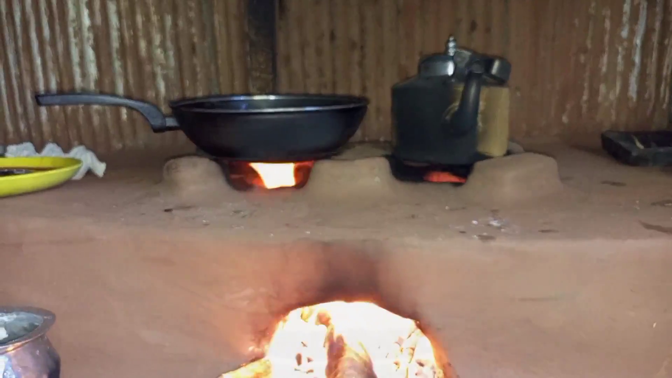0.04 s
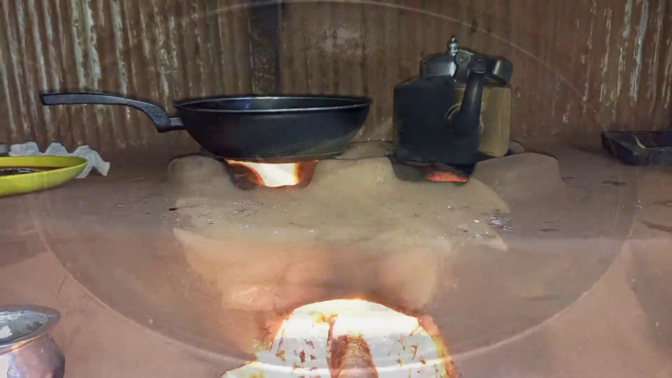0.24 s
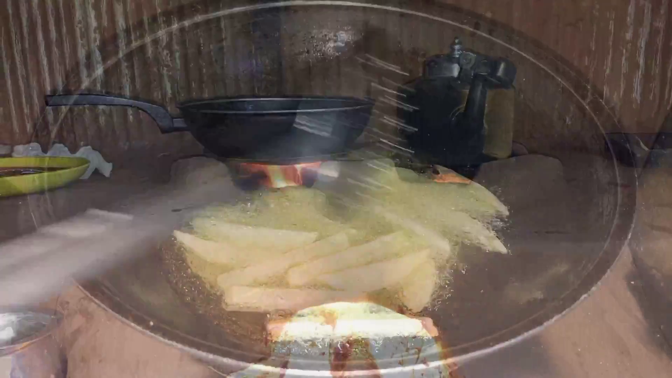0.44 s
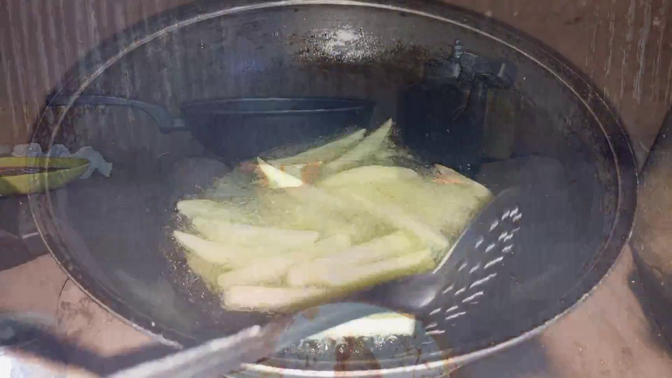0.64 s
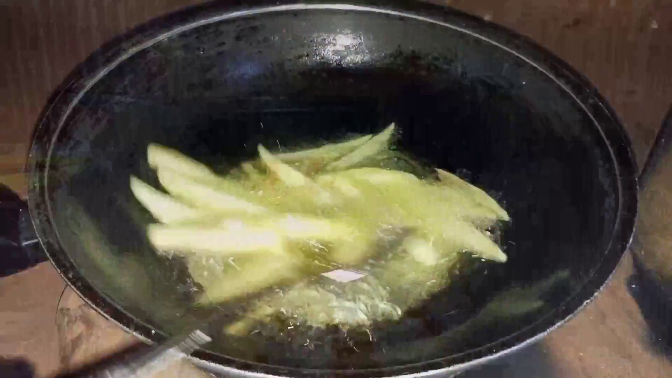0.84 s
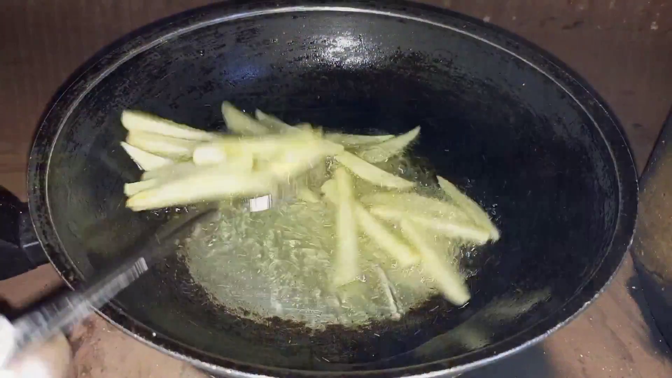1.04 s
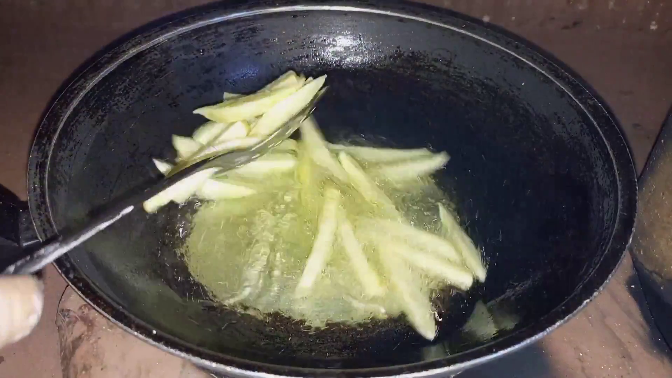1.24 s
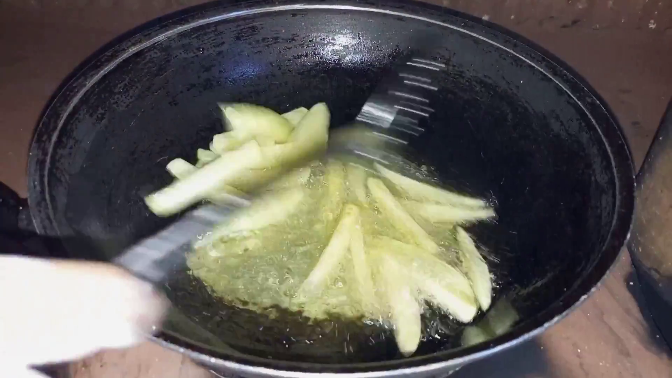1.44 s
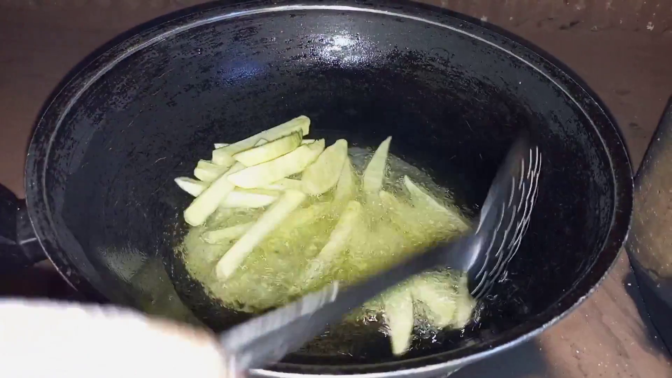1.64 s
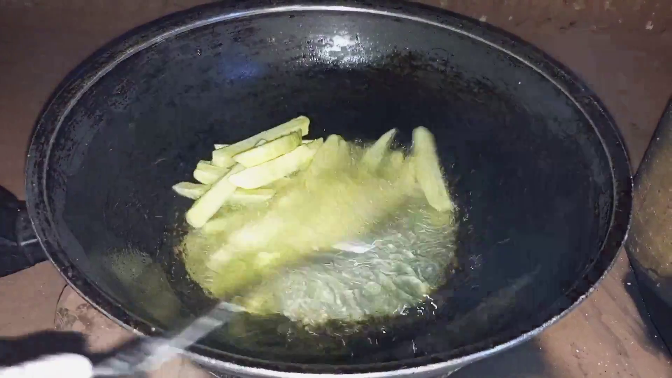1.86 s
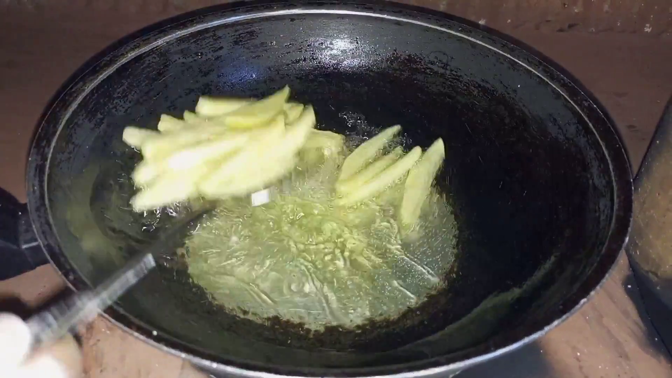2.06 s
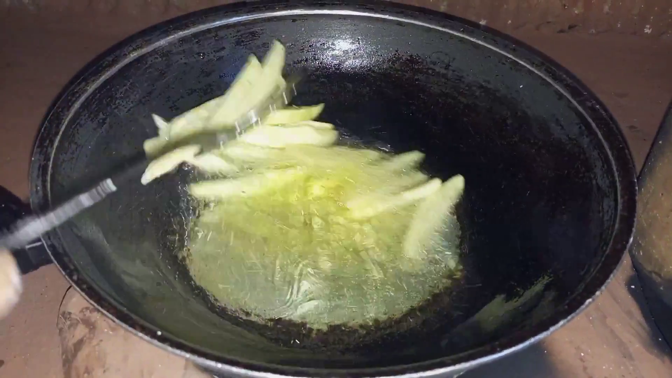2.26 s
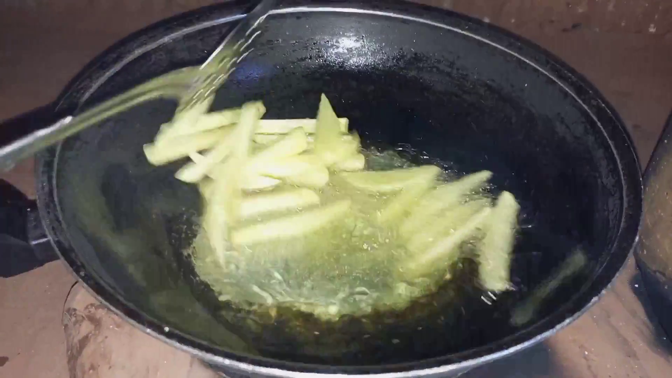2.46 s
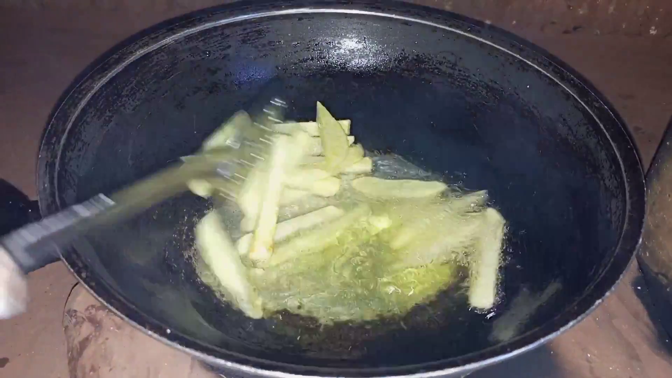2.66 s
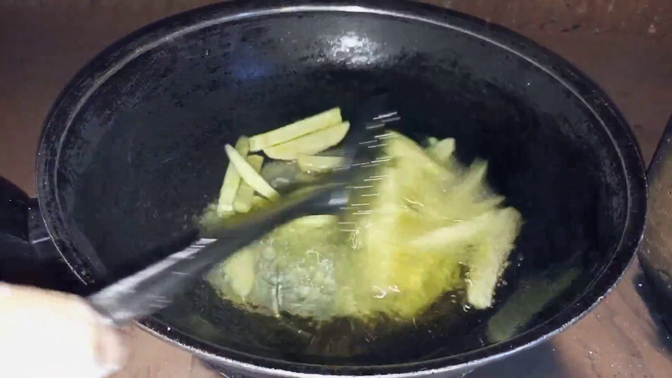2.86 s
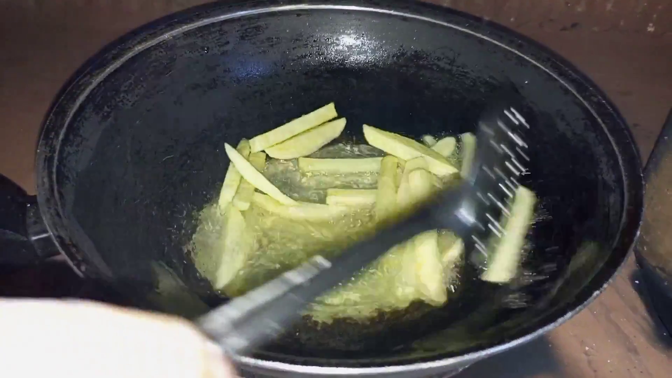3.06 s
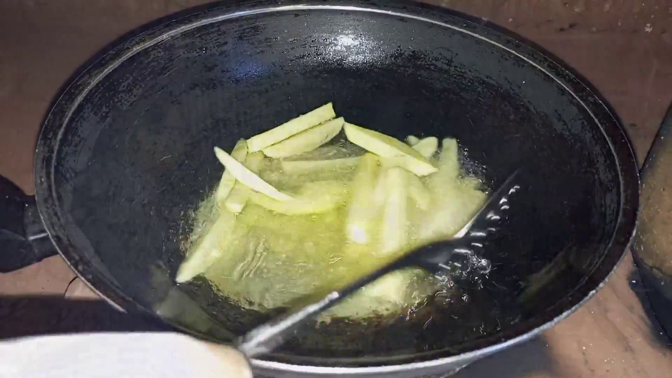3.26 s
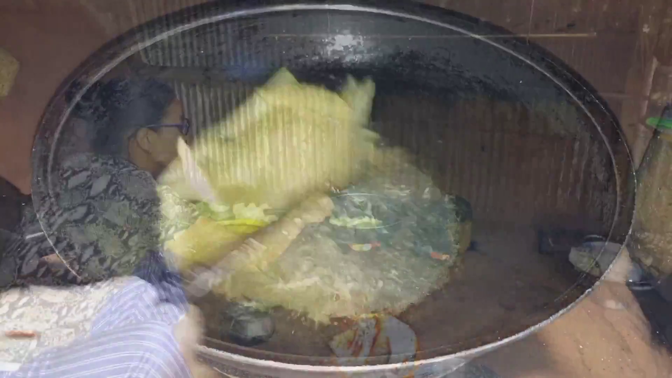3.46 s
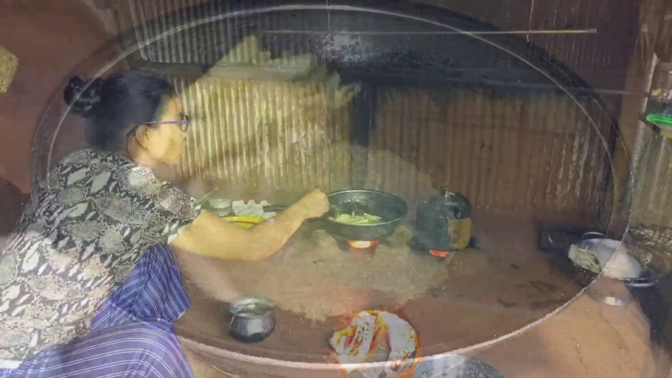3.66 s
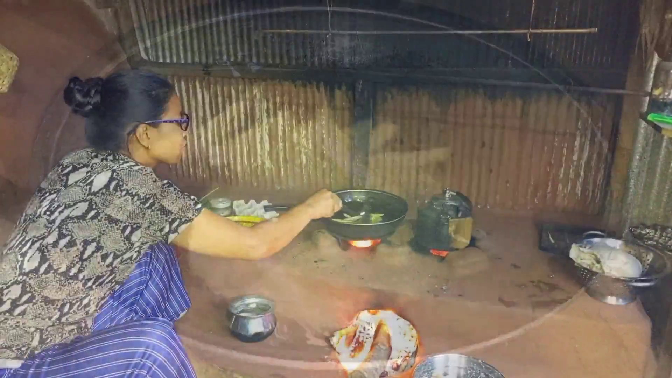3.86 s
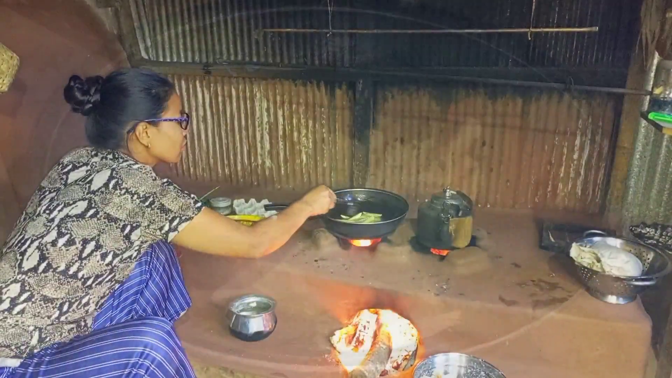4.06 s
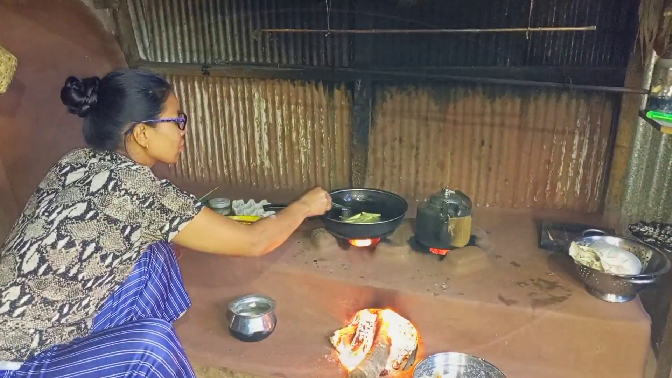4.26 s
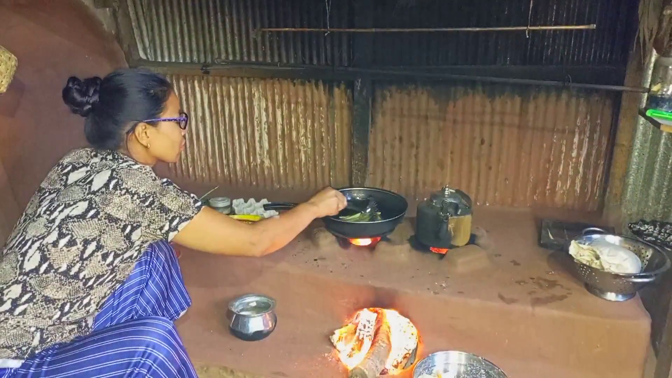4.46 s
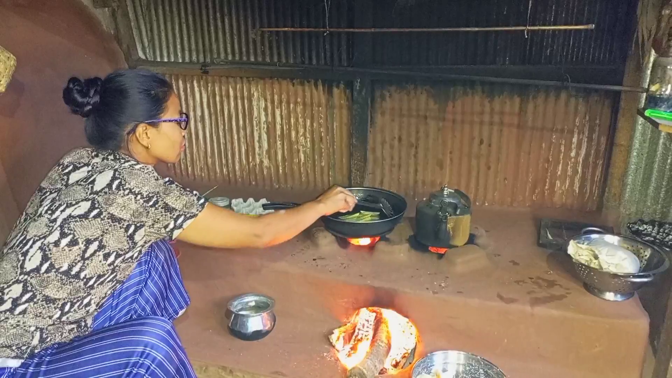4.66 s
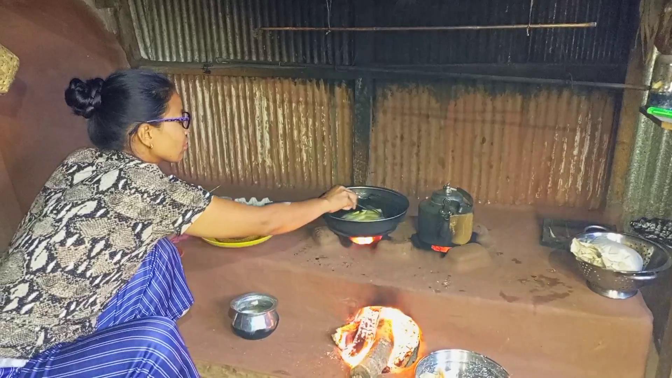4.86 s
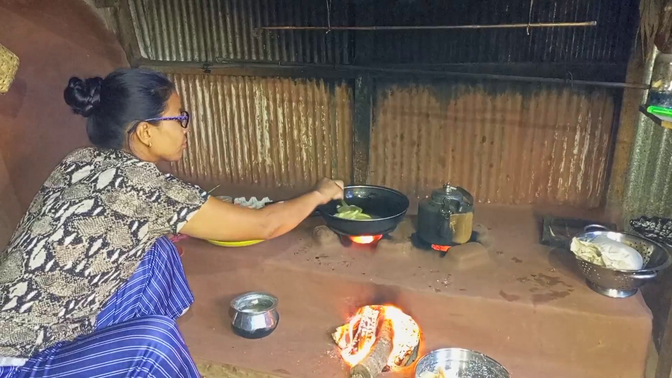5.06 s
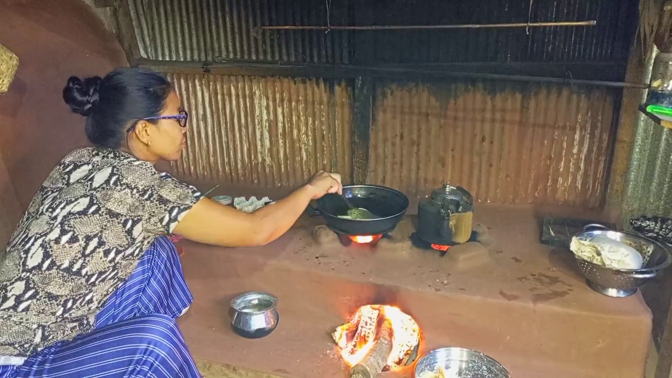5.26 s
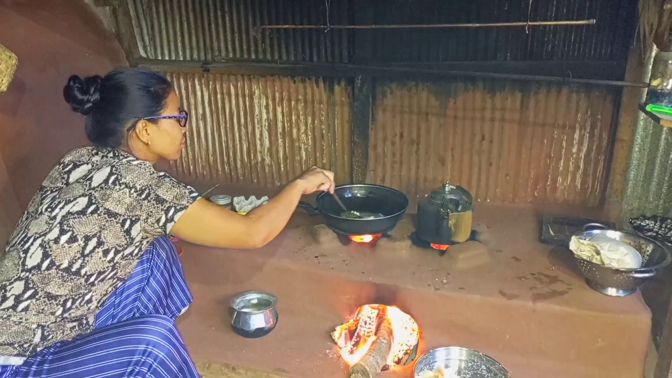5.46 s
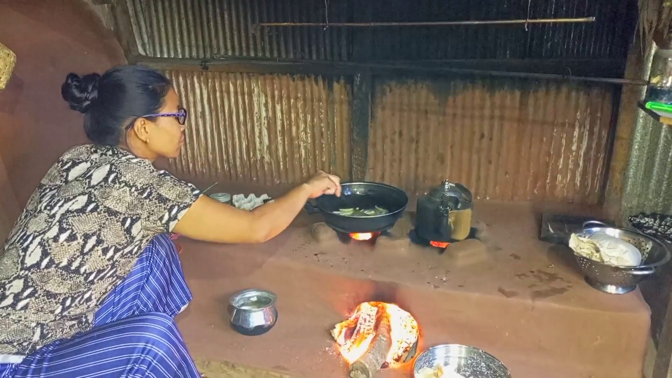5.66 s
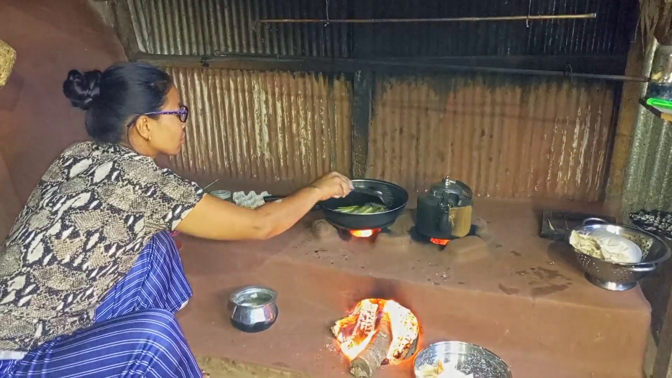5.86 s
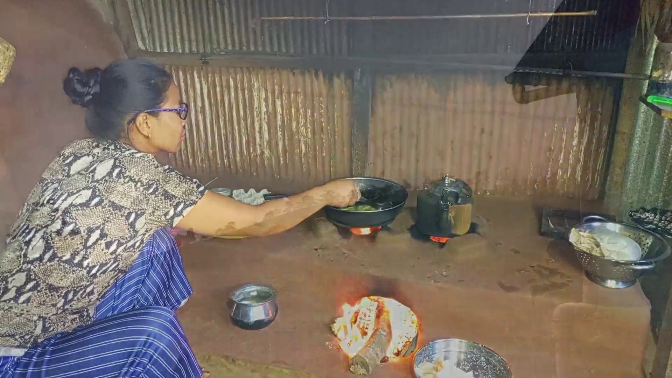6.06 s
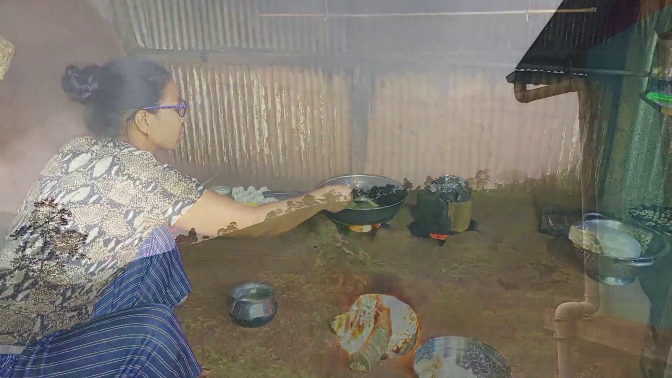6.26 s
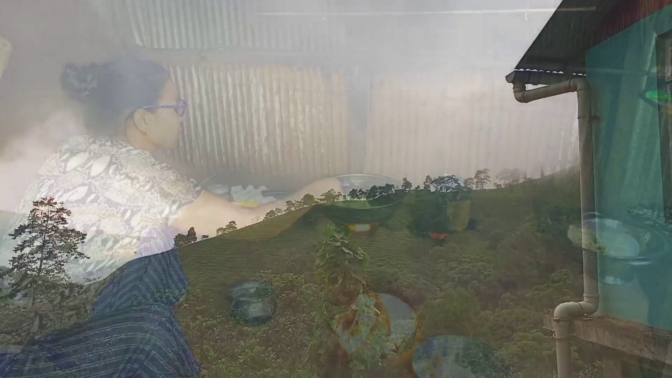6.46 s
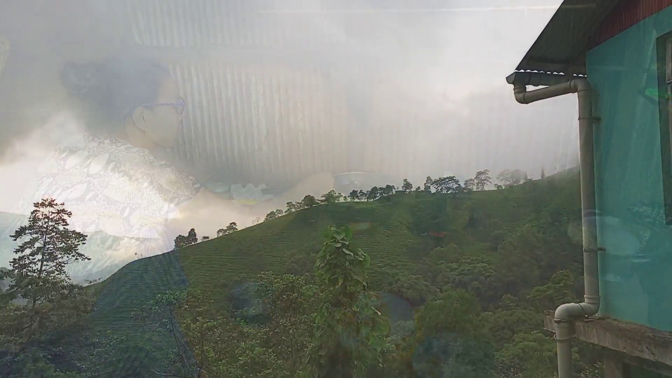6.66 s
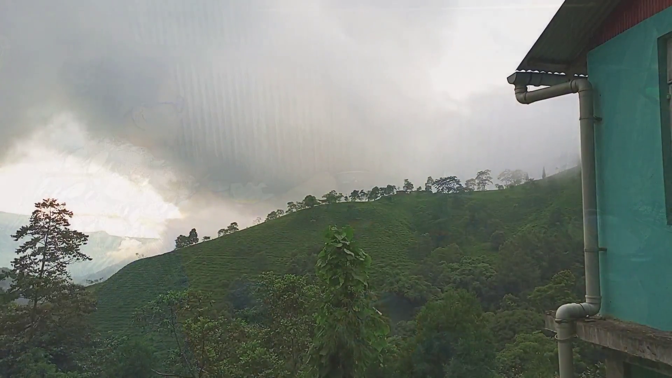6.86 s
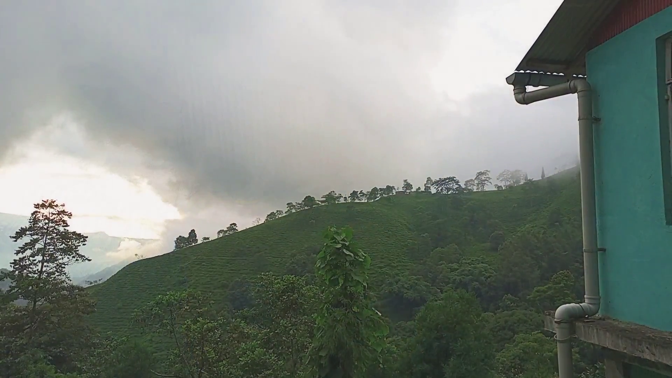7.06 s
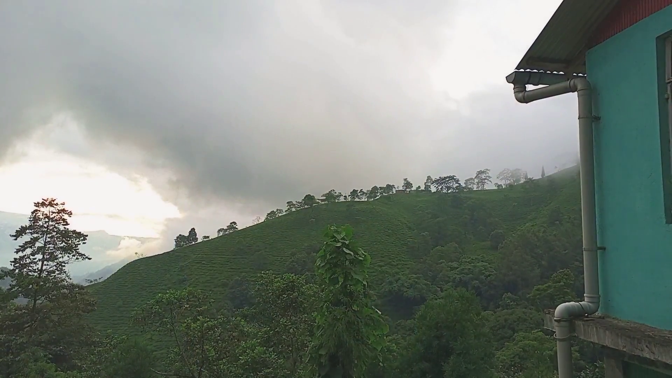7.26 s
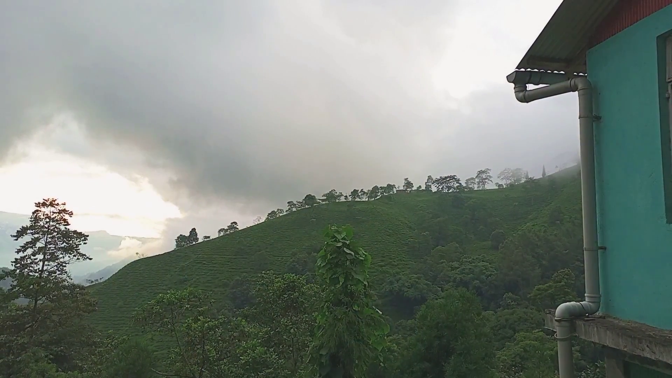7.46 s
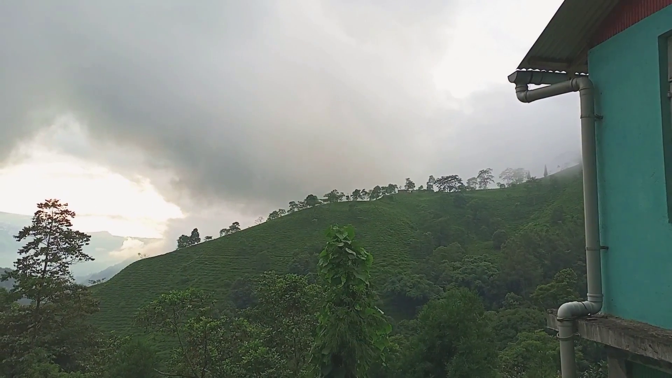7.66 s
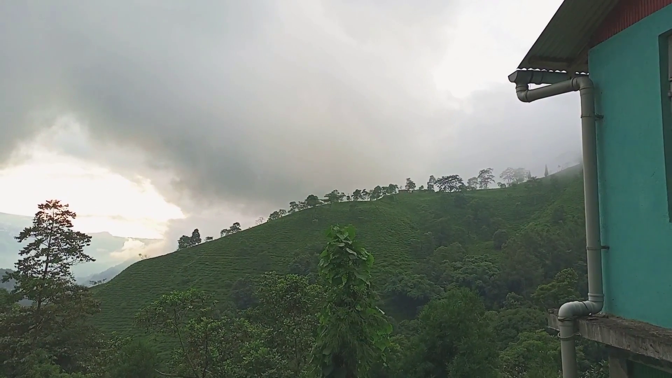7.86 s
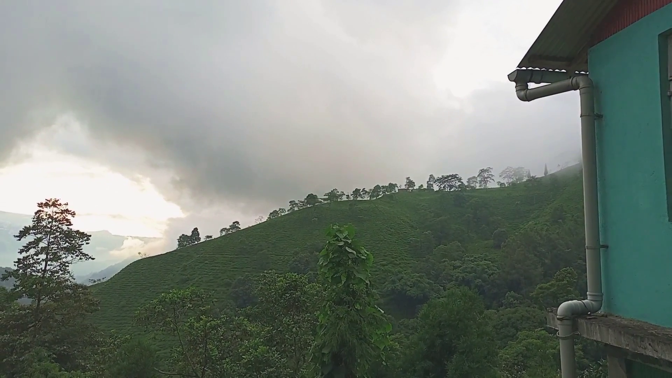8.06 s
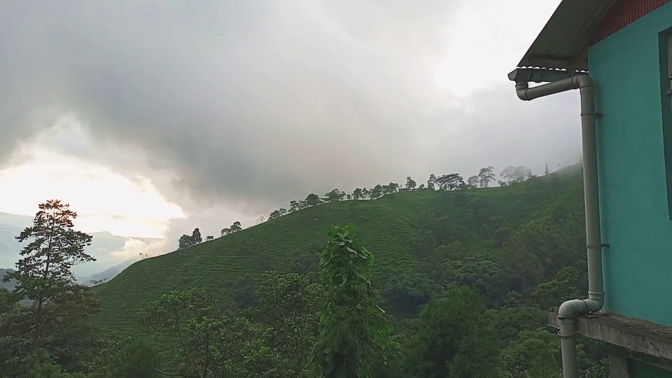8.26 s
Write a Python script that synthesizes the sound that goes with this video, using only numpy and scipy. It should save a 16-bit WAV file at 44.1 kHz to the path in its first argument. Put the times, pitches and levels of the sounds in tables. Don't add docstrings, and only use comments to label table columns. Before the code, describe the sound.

Crisp frying hiss with sharp clanks and ringing scrapes of a metal utensil in a wok, fading at the end to soft outdoor water and insect trills.

```python
import sys
import numpy as np
from scipy import signal
from scipy.fft import rfft, next_fast_len
from scipy.io import wavfile
from scipy.ndimage import uniform_filter1d

SR = 44100
rng = np.random.default_rng(int(sys.argv[2]) if len(sys.argv) > 2 else 0)


def wav_record(signal):
    frames = np.transpose(np.atleast_2d(signal))
    bounded = np.clip(frames, -1, 1)
    quanta = np.round(bounded * 32767).astype(np.int16)
    wavfile.write(sys.argv[1], SR, quanta)


def to_linear_factor(level_db):
    exponent = np.asarray(level_db, float) / 20
    return 10 ** exponent


N = 366559


def evened(x):
    return x / np.sqrt(np.mean(x ** 2) + 1e-20)


def curve(rows, t, column=1):
    rows = np.asarray(rows)
    return np.interp(t, rows[:, 0], rows[:, column])


def read(points, hz):
    f, value = np.transpose(points)
    return np.interp(np.log(hz + 1), np.log(f + 1), value, -120, -120)


def add(mix, s, sound):
    part = mix[round(s * SR):][:len(sound)]
    part += sound[:len(part)]


def highpass(x, order, hz):
    return signal.sosfilt(signal.butter(order, hz, "high", fs=SR, output="sos"), x)


def ring(x, hz, width):
    r, turn = np.exp(-np.pi * width / SR), 2 * np.pi * hz / SR
    gain = np.sqrt(2 * (1 - r ** 2))
    return gain * signal.lfilter([0, r * np.sin(turn)], [1, -2 * r * np.cos(turn), r ** 2], x)


def spatter(per_s, spread_db, size):
    draw = rng.random((size, 3))
    big = to_linear_factor(-spread_db * np.log(np.maximum(draw[:, 0], .02)))
    return evened(big * np.sign(draw[:, 1] - .5) * (draw[:, 2] < per_s / SR))


def band_rms(x, lo, hi):
    z = rfft(x, next_fast_len(len(x)))
    hz = np.linspace(0, SR / 2, len(z))
    power = abs(z) ** 2
    return np.sqrt(np.mean(x ** 2) * np.sum(power[(hz > lo) & (hz < hi)]) / np.sum(power))


def shaped(x, colour, band, streak_db, patch_db, flicker_db, level_db):
    hz, t, z = signal.stft(x, SR, nperseg=1024, noverlap=768)
    a, b = rng.standard_normal((len(t), len(hz), 2)).T
    streaks = evened(uniform_filter1d(a, size=8, axis=1)) * np.clip(5000 / (hz[:, None] + 1), 0.4, 1)
    patches = evened(uniform_filter1d(uniform_filter1d(b, size=14, axis=0), size=15, axis=1))
    flicker = evened(uniform_filter1d(b.mean(0), size=2))
    uneven_db = streak_db * streaks + patch_db * patches + flicker_db * flicker
    z = z * to_linear_factor(read(colour, hz)[:, None] + uneven_db)
    scale = band_rms(signal.istft(z, nperseg=1024, noverlap=768)[1], *band)
    played = z * to_linear_factor(level_db(t, hz[:, None]))
    return signal.istft(played, nperseg=1024, noverlap=768)[1][:N] / scale


# time in seconds, sizzle in dB, fine spray against the sizzle in dB.
FRYING = [(0.0, -55.5, -2.5), (0.54, -57.5, -3.5), (0.92, -54, -5), (1.13, -55.5, 0), (1.54, -51, -0.5),
          (1.9, -51.5, -2.5), (2.21, -53, 1), (2.61, -49, -2), (2.88, -54.5, 0), (3.11, -49.5, -3.5),
          (3.4, -50.5, -2.5), (3.61, -53.5, -2), (4.4, -61.5, -1.5), (5.01, -59.5, -0.5), (5.32, -59, -3.5),
          (5.9, -56.5, -3), (6.49, -64.5, -3), (7.1, -70, -4.5)]
# frequency in Hz, density in dB per Hz.
FIZZ = [(2470, -48), (4200, -12.5), (4410, -42), (5060, -4.5), (5740, 0.5), (6690, 3), (7880, -1.5),
        (9290, 2), (10200, -3.5), (11400, -17.5), (13500, -22.5), (14900, -13.5), (15500, -7.5)]
# frequency in Hz, change from the close fizz in dB.
AFAR = [(0, 0), (4600, 0), (4950, 2), (5400, 5.5), (6400, -4), (7400, -3), (8700, -2), (9700, 1),
        (11000, 0), (23000, -0.5)]
# time in seconds, distance from 0 close to 1 far.
DISTANCE = [
    (0.4, 1),
    (0.75, 0.18),
    (1.2, 0.029),
    (3.6, 0),
    (4.2, 0.3),
    (4.7, 0.7),
    (5.4, 0.61),
]
AIR_DB = -70.5
MIST_DB, AIR_DULL_DB, OUTDOORS_S = 1, -3, 6.8
HOLLOW_DB, HOLLOW_HZ, HOLLOW_WIDTH_HZ, HOLLOW_SHARE = -52, 7240, 1100, 0.57


def frying():
    pops = rng.standard_normal(N) + 0.38 * spatter(3500, 11, size=N)

    def level_db(t, hz):
        spray = np.clip((hz - 7500) / 900, 0, 1)
        mist = np.clip((hz - 10800) / 500, 0, 1)
        fizz_db = curve(FRYING, t)
        spray_db = np.maximum(fizz_db + curve(FRYING, t, column=2) + 2.5, AIR_DB)
        hollow = np.exp(-((hz - HOLLOW_HZ) / HOLLOW_WIDTH_HZ) ** 2)
        hollow_db = HOLLOW_SHARE * np.minimum(fizz_db - HOLLOW_DB, 0) * hollow
        afar_db = (curve(DISTANCE, t) - 0.3) * read(AFAR, hz)
        mist_db = MIST_DB + AIR_DULL_DB * np.clip((t - OUTDOORS_S) / .15, 0, 1)
        return hollow_db + afar_db + fizz_db * (1 - spray) + spray_db * spray + mist_db * mist
    return shaped(pops, FIZZ, (4900, 7400), 2.96, 0.83, 0.41, level_db)


# frequency in Hz, width in Hz, level in dB.
WOK = [(341.4, 5.3, -9), (420, 12, -17), (526, 7.8, -40), (570, 4, -1.5), (663, 34, -4.5), (823, 32, -4),
       (996, 3.3, -13.5), (1069, 16, -7), (1190, 14, -5), (1228, 20, -2.5), (1338, 23, -8.5),
       (1438, 50, -12), (1650, 45, -7), (1845, 31, -3), (2037, 10.5, -3), (2120, 10.5, -12), (2273, 19, 0),
       (2496, 89, 6), (2570, 11, -5), (2690, 18, -26), (2740, 7.1, -30), (3190, 21, -6), (3222, 18, 4.5),
       (3340, 11, -14), (3460, 15, -1.5), (3775, 49, 0.5), (4080, 19, -28), (4370, 12, -47)]
# start in seconds, pressure in dB, easing in dB per s,
# height on the wall as treble lean in dB, climb in dB per s.
STROKES = [(.315, -72, -140, -13, 100), (0.759, -46.5, -200, 6, 5), (.793, -53, -6, -3.5, -41),
           (1.026, -55, -38, -8, 52), (1.515, -51, -64, -4.5, 70), (1.8163, -34.5, -90, 0, 5),
           (1.87, -39, -61, -5.5, -16), (1.972, -41.5, -70, 0, -15), (2.047, -43.5, -60, -5, -30),
           (2.099, -54.5, -51, -16, 110), (2.42, -57, -49, 8, -5), (2.522, -50, -160, -12.5, 18),
           (2.797, -56, -35, -1.5, 14), (3.342, -37, -100, -11.5, 107), (3.441, -48.5, -41, -2, 1),
           (3.69, -64, -28, -8, 5), (3.745, -58, -40, 6, -34), (4.061, -56.5, -250, -4, 150),
           (4.41, -65, -53, -3, 37), (4.879, -51, -48, -14, 40), (6.045, -45.5, -105, 0.5, -28),
           (6.284, -67, -58.5, -9.5, 66), (6.789, -54.5, -230, 2, -10)]
STROKE_S, OUTER_DB = 0.94, -5
RASP_HZ = 1200


def scraping():
    t, slow = np.arange(N) / SR, np.arange(0, N + 200, 200) / SR
    drive_db = np.full((3, N), -140.)
    for s, press_db, ease_db, lean_db, climb_db in STROKES:
        first = round(s * SR)
        since = t[first:first + SR] - s
        middle_db = np.where(since < STROKE_S, press_db + ease_db * since, -140)
        high_db = lean_db + climb_db * np.minimum(since, STROKE_S)
        outer_db = middle_db + OUTER_DB
        drive_db[:, first:first + SR] = [outer_db - high_db, middle_db, outer_db + high_db]
    slips = 0.58 * spatter(600, 2.4, size=N) + 0.6 * rng.standard_normal(N)
    groups = np.zeros((3, N))
    for hz, width, db in WOK[1:]:
        k = int(hz > 950) + int(hz > 2200)
        flutter_db = 5.7 * evened(uniform_filter1d(rng.standard_normal(len(slow)), size=12))
        touch = slips * np.interp(t, slow, to_linear_factor(db + flutter_db))
        rubbed_width = max(1.6 * width, 8) * (1 + hz / RASP_HZ * (width < 15))
        groups[k] += ring(touch, hz, rubbed_width)
    steady = groups / np.sqrt(uniform_filter1d(groups ** 2, size=3000, axis=1))
    pressure = uniform_filter1d(to_linear_factor(drive_db - 5.5), size=60, axis=1)
    return highpass((steady * pressure).sum(0), 4, 400)


TICK, TICK_S = 1.7, 0.00063


def blow(modes, chatter_s, crack, strike):
    t = np.arange(SR // 5) / SR
    hold = np.exp(-(t / max(chatter_s, .001)) ** 1.1) * np.minimum(t / 0.00046, 1)
    force = rng.standard_normal(len(t)) * hold + strike * np.linalg.norm(hold) * (t == 0)
    sound = sum(to_linear_factor(db) * ring(ring(force, hz, 290), hz, 1.9 / t60) for hz, db, t60 in modes)
    middle_hz = np.median(modes, axis=0)[0]
    wide = ring(ring(force, middle_hz, 4700), middle_hz, 4700)
    tick = TICK * np.exp(-t / TICK_S) * np.cos(2 * np.pi * middle_hz * t)
    return sound / abs(sound).max() + crack * (wide / abs(wide).max() + tick)


# start in seconds, peak in dB, loudest mode in Hz, brightness in dB per octave.
KNOCKS = [(0.307, -66, 2470, -4), (0.7593, -26.5, 600, 2), (.7697, -41, 900, 2), (.782, -43, 700, 4),
          (.856, -40.5, 1220, 6), (1.033, -33.5, 1360, 1), (1.24, -60, 1710, -2), (1.322, -35.5, 2690, -9),
          (1.51, -42, 1490, -1.5), (1.8178, -21.5, 596, -2), (1.8265, -31, 2420, -6),
          (1.872, -24, 1170, -19), (1.94, -30, 1250, -5), (1.972, -27.5, 1260, 8), (2.046, -26.5, 1100, 10),
          (2.083, -36, 563, -5), (2.377, -38, 2820, -5), (2.526, -31.5, 787, 2), (2.583, -39, 854, 14),
          (3.3422, -24.5, 595, 8), (3.351, -39, 830, 14), (3.357, -24.5, 1200, 10.5), (3.365, -32, 806, 3),
          (3.385, -30, 807, 2), (3.396, -28, 600, 4), (4.057, -39.5, 487, -21), (4.88, -31, 996, -3),
          (4.889, -35, 1475, -5), (4.981, -40.5, 584, 21), (6.046, -39, 1410, -20), (6.058, -35, 750, -7),
          (6.786, -47, 857, 4)]


def knocks():
    out = np.zeros(N)
    for s, db, loud_hz, bright_db in KNOCKS:
        modes = [(loud_hz, -5.5, .055)]
        for hz, _, mode_db in WOK[1:]:
            off_db = -27.8 * abs(np.log2(hz / loud_hz))
            modes.append((hz, mode_db + off_db + bright_db * np.log2(hz / 1000), .06))
        add(out, s, to_linear_factor(db - 8) * blow(modes, chatter_s=0.0046, crack=0.025, strike=1.05))
    return out


# start in seconds, peak in dB, chatter in seconds.
CLANGS = [
    (0.7599, -25, 0.019),
    (1.8169, -18.5, 0.018),
    (3.3442, -25.5, 0.038),
    (3.4393, -31.5, 0.006),
    (3.454, -34, 0.012),
    (4.0594, -36, 0.024),
    (6.048, -27.5, 0.0079),
    (6.058, -30.5, 0.029),
]
# frequency in Hz, level in dB.
BLADE = [
    [(2590, -22), (3320, -14), (3984, -11), (4500, -16), (5055, 0), (5825, -10), (6304, -14), (7154, -5),
     (7520, 3.5), (8096, -9), (8387, -7.5), (8920, -12), (9803, -2)],
    [(2470, -5.5), (3310, -11), (4130, -19), (4630, -4.5), (4710, -7), (5150, -0.5), (5760, -1.5),
     (6490, 0.5), (6930, -1), (6430, 0.5), (7370, 1.5), (8850, -11), (11000, -12.5)],
    [(2008, -7), (3250, -1.5), (4850, 5.5), (5125, 2), (5561, -2), (6142, 14), (6336, 13), (6605, 6),
     (6966, 9), (9125, -5)],
    [(5900, -25), (6213, -9), (7230, -32)],
    [(5900, -25), (6200, -11), (6500, -22)],
    [(3300, -13), (3900, -14), (5000, -10), (5500, -16), (6150, -1), (7450, 0)],
    [(3340, -10), (5230, 10.5), (5280, 6), (5469, -18), (5490, 1), (6330, -1), (6600, 0), (7500, -17),
     (7324, -1.5), (8970, -0.5)],
    [(3400, -10.5), (4850, -2), (5300, 3.5), (5700, 0), (6330, 4.5), (6600, -6), (7320, -4)],
]
BLADE_T60_S = 0.03


def clangs():
    out = np.zeros(N)
    for (s, db, chatter_s), table in zip(CLANGS, BLADE):
        modes = [(hz, mode_db, BLADE_T60_S) for hz, mode_db in table]
        add(out, s, to_linear_factor(db - 1.5) * blow(modes, chatter_s, crack=0.28, strike=0.45))
    return out


# start in seconds, peak in dB, pitch in Hz, ring in seconds.
TAPS = [(0.7606, -33, 3900, 0.0018), (0.7604, -35, 900, 0.0028), (.769, -36, 3920, .003),
        (1.8187, -21, 5200, .0007), (1.819, -28, 660, .003), (1.8749, -35, 1150, .003),
        (1.925, -32, 7000, .001), (2.0463, -30, 1050, .005), (3.462, -36, 6200, .005),
        (3.3428, -28, 615, 0.0027), (4.8805, -41, 1070, .014), (4.893, -39, 1450, .006),
        (4.995, -48, 1650, .012), (1.819, -32, 520, .012), (6.787, -50, 800, .008),
        (1.237, -50.5, 1730, 0.0091), (1.32, -55.5, 3550, .008), (2.749, -41, 7400, .003),
        (2.483, -45, 7100, .004)]


def taps():
    out, t = np.zeros(N), np.arange(SR // 20) / SR
    for s, db, hz, ring_s in TAPS:
        click = np.minimum(t * hz, 1) * np.exp(-t / ring_s) * np.sin(2 * np.pi * hz * t)
        add(out, s, to_linear_factor(db) * click)
    return highpass(out, 4, 330)


CHIME_RISE_S, SING_RISE_S = 0.002, 0.007
STEADY, LOOSE = 0.59, 6.9


def squeak(length_s, first_hz, last_hz, width_hz, rise_s, steady):
    hz = np.geomspace(first_hz, last_hz, round(length_s * SR))
    n = len(hz)
    t = np.arange(n) / SR
    fade = np.minimum((1 - t / length_s) / 0.19, 1) * (1 - 0.37 * t / length_s)
    shape = np.minimum(t / rise_s, 1) * fade
    r = np.exp(-np.pi * width_hz / SR)
    draw = rng.standard_normal((n + SR // 20, 2))
    wander = signal.lfilter([1], np.convolve([1, -r], [1, -r]), draw[:, 0] + 1j * draw[:, 1])[-n:]
    wander = wander / np.sqrt(abs(wander) ** 2 + steady * np.mean(abs(wander) ** 2))
    carrier = np.exp(2j * np.pi * np.cumsum(hz) / SR)
    return evened((wander * carrier).real) * shape


def held_notes(notes, rise_s):
    out = np.zeros(N)
    for s, length_s, hz, db in notes:
        add(out, s, to_linear_factor(db) * squeak(length_s, hz, hz, 60 + 0.018 * hz, rise_s, STEADY))
    return out


# start in seconds, level in dB.
HUMS = [
    (.763, -59),
    (1.525, -69),
    (1.818, -48.5),
    (1.952, -56),
    (2.533, -62),
    (3.343, -48.5),
    (6.054, -64.5),
]
# start in seconds, pitch in Hz, level in dB.
CHIMES = [(0.758, 1067, -53), (.76, 4000, -69), (1.817, 8720, -56), (2.046, 2450, -55),
          (3.342, 1030, -42.5), (3.3416, 8800, -44.5), (4.064, 2850, -58), (4.881, 2790, -54),
          (4.885, 2570, -60), (4.89, 2240, -61.5), (6.05, 3450, -61), (6.059, 4900, -54), (6.788, 743, -61),
          (1.812, 7350, -48), (.757, 7520, -55), (4.91, 5280, -58), (4.92, 6300, -63), (4.92, 2670, -59),
          (3.35, 5500, -47.5)]
HUM_S, CHIME_S = .125, .055


def chiming():
    hums = [(s, HUM_S, WOK[0][0], db) for s, db in HUMS]
    chimes = [(s, CHIME_S, hz, db) for s, hz, db in CHIMES]
    return held_notes(hums + chimes, CHIME_RISE_S)


# start in seconds, length in seconds, pitch in Hz, level in dB.
SINGING = [(0.844, 0.093, 1214, -54), (0.85, 0.04, 1810, -55), (.9, 0.039, 1750, -54),
           (0.861, 0.058, 394, -53), (0.879, 0.064, 3070, -58), (0.961, 0.27, 588, -61.5),
           (1.32, 0.12, 2400, -63), (1.44, 0.041, 4090, -62), (1.564, 0.085, 1890, -59),
           (1.678, 0.093, 3130, -54), (1.89, 0.065, 5120, -53), (2.015, .03, 5910, -54),
           (1.935, 0.015, 6100, -53), (2.12, 0.066, 2090, -60.5), (1.97, 0.062, 2650, -58),
           (1.02, 0.1, 2160, -64), (.9, .04, 2200, -62), (1.1, 0.092, 620, -56.5),
           (2.142, 0.16, 593, -58.5), (2.281, 0.09, 2360, -64), (2.297, 0.066, 1565, -63),
           (2.619, 0.039, 1810, -60), (2.69, 0.093, 6250, -49.5), (3.39, 0.045, 3340, -56),
           (3.411, 0.075, 1220, -49), (3.47, 0.27, 570, -56), (3.75, 0.11, 3160, -65),
           (3.812, 0.068, 1560, -65), (3.852, 0.04, 6200, -56), (4.295, 0.051, 5110, -59.5),
           (4.972, 0.13, 807, -57), (4.98, 0.093, 1650, -63), (5.93, 0.075, 2680, -67.5),
           (6.21, 0.06, 1200, -76), (6.07, .1, 2580, -64), (6.11, 0.067, 850, -62), (6.12, .09, 1344, -63),
           (3.36, .05, 4840, -53), (3.5, 0.19, 1247, -61.5), (3.56, .1, 2000, -64), (3.8, 0.15, 640, -67),
           (1.85, .05, 1995, -57), (1.935, 0.029, 2490, -52), (1.98, .07, 603, -49), (3.5, .08, 5900, -53),
           (3.41, 0.026, 6100, -51), (6.12, .06, 4850, -62)]
# start in seconds, pitch in Hz.
GRAZES = [(.971, 2120), (1.616, 3150), (3.565, 1910), (3.871, 700), (3.947, 2050), (4.382, 4160),
          (4.399, 780), (4.565, 2140), (4.68, 2570), (5.02, 2550), (5.07, 2550), (5.19, 2600), (4.7, 5000),
          (4.77, 5700), (4.45, 1750), (1.37, 1600), (1.04, 5900), (5.141, 600), (6.155, 3250),
          (6.434, 2420)]
GRAZE_S, GRAZE_DB = 0.066, -69


def singing():
    grazes = [(s, GRAZE_S, hz, GRAZE_DB) for s, hz in GRAZES]
    return held_notes(SINGING + grazes, SING_RISE_S)


# start in seconds, length in seconds, first Hz, last Hz, level in dB.
CLIMBS = [
    (1.1, .11, 900, 1250, -63),
    (1.18, 0.1, 800, 1300, -62),
    (1.24, 0.1, 1600, 2150, -58),
    (1.27, 0.09, 2300, 2750, -57),
    (1.13, .05, 1900, 2300, -63),
    (2.29, .13, 2100, 3000, -64),
    (2.36, 0.07, 2900, 3800, -59),
]
# start in seconds, length in seconds, first Hz, last Hz, level in dB.
WHINES = [
    (6.26, 0.13, 1150, 1330, -68),
    (6.33, 0.066, 1680, 1900, -69),
    (6.39, 0.056, 2500, 2900, -72),
    (6.2, 0.11, 840, 660, -73),
    (5.08, .06, 730, 650, -72),
    (2.195, 0.0145, 8000, 9200, -47),
]


def climbing():
    out = np.zeros(N)
    for table, width_hz, steady in (CLIMBS, 380, LOOSE), (WHINES, 81, STEADY):
        for s, length_s, first_hz, last_hz, db in table:
            add(out, s, to_linear_factor(db) * squeak(length_s, first_hz, last_hz, width_hz, SING_RISE_S, steady))
    return out


# start in seconds, length in seconds, centre in Hz, level in dB.
SPLASHES = [(2.4, .05, 6500, -46), (2.46, .035, 7000, -55), (.76, .035, 4300, -51.5),
            (1.82, 0.044, 5600, -46), (3.345, .05, 6700, -46), (7.235, .04, 5000, -70),
            (.765, .04, 6200, -49), (1.83, .05, 3300, -52), (6.8, .06, 6200, -66), (6.5, .05, 5200, -66),
            (3.36, .05, 5300, -49)]
SPLASH_WIDTH_HZ = 1500


def splashes():
    out = np.zeros(N)
    for s, length_s, hz, db in SPLASHES:
        add(out, s, to_linear_factor(db) * squeak(length_s, hz, hz, SPLASH_WIDTH_HZ, CHIME_RISE_S, LOOSE))
    return highpass(out, 4, 330)


# start in seconds, peak in dB, pitch in Hz.
THUMPS = [(0.296, -68, 108), (0.767, -65, 233), (1.137, -61, 157), (1.375, -62, 173), (1.895, -58, 170),
          (2.073, -56, 110), (2.795, -57.5, 118), (3.351, -48.5, 233), (3.44, -54.5, 165),
          (3.555, -65, 140), (3.971, -70, 176), (4.064, -65, 240), (6.062, -52.5, 242)]
NUDGES = [.021, 1.819, 2.404, 2.47, 2.944, 3.054, 4.756, 5.613, 7.502, 7.935]
NUDGE_DB, NUDGE_HZ = -66.5, 165


def thumps():
    out, t = np.zeros(N), np.arange(SR // 5) / SR
    for s, db, hz in THUMPS + [(s, NUDGE_DB, NUDGE_HZ) for s in NUDGES]:
        force = rng.standard_normal(len(t)) * t * np.exp(-t / 0.0098)
        push = highpass(ring(ring(force, hz, 96), hz, 96), 2, 60)
        add(out, s, to_linear_factor(db - 3.5) * push / abs(push).max())
    return out


# frequency in Hz, density in dB per Hz.
KITCHEN = [(12, -36), (20, -6), (48, -16.5), (171, -11), (335, -16), (557, -15), (718, -14), (788, -15.5),
           (2560, -7), (3600, -11), (4300, -12.5), (5000, -4), (6500, -39), (11000, -120)]
SIMMER_DB, SIMMER_SHARE, QUIET_DB = -66.5, 0.59, -72.5
FIRE_DB, FIRE_S = 2.5, 0.35


def simmer_and_fire():
    def level_db(t, hz):
        simmer_db = SIMMER_DB + SIMMER_SHARE * (curve(FRYING, t) - FRYING[0][1])
        return np.maximum(simmer_db, QUIET_DB) + FIRE_DB * np.maximum(1 - t / FIRE_S, 0)
    return to_linear_factor(-.5) * shaped(rng.standard_normal(N), KITCHEN, (1300, 4600), 3.0, 1.3, .5, level_db)


# time in seconds, level in dB.
HILL = [
    (6.1, -100),
    (6.5, -70),
    (6.8, -65),
    (7.25, -60),
    (8.31, -59),
]
# frequency in Hz, density in dB per Hz.
STREAM = [(20, -45), (60, -32), (130, -9), (280, -9.5), (420, -13), (1200, -13.5), (1400, -6.5), (2500, 0),
          (3300, -3), (4100, -1.5), (5100, -0.5), (7100, -5.5), (7800, -11.5), (9500, -48)]
# time in seconds, level against the stream in dB.
CHORUS = [
    (7.25, -11.5),
    (7.7, -3.5),
]


def stream():
    drops = 0.9 * rng.standard_normal(N) + 0.35 * spatter(600, 4.3, size=N)

    def level_db(t, hz):
        return curve(HILL, t) + curve(CHORUS, t) * np.exp(-((hz - 4000) / 550) ** 2)
    return shaped(drops, STREAM, (200, 15600), 2.6, 0.46, 0.31, level_db)


# start in seconds, length in seconds, pitch in Hz, width in Hz, level in dB.
TRILLS = [(6.75, .75, 7290, 70, -72), (7.5, .5, 7200, 120, -79), (7.95, .36, 7200, 90, -74),
          (7.74, .21, 4230, 60, -70), (8.17, .14, 4580, 25, -67), (7.21, .12, 3050, 120, -69),
          (7.34, .04, 2700, 900, -67), (7.43, .03, 2800, 700, -67), (7.5, .035, 2500, 900, -67),
          (8.1, .2, 2580, 90, -69), (7.232, .045, 4000, 400, -61), (7.09, .06, 2150, 200, -70),
          (8.06, .07, 5100, 250, -66), (7.4, .14, 230, 30, -73.5)]


def trills():
    out = np.zeros(N)
    for s, length_s, hz, width_hz, db in TRILLS:
        throb_hz = min(55, hz / 45)
        t = np.arange(0, length_s, 1 / SR)
        drive = rng.standard_normal(len(t)) * (1.6 + np.cos(2 * np.pi * throb_hz * t))
        note = ring(ring(drive, hz, width_hz), hz, width_hz)
        note /= np.sqrt(uniform_filter1d(note ** 2, size=1300) + .3)
        add(out, s, to_linear_factor(db) * evened(note) * signal.windows.tukey(len(t), .4))
    return out


def scene():
    steel = scraping() + knocks() + clangs() + chiming() + singing() + climbing()
    near = frying() + highpass(steel, 4, 250) + taps() + splashes() + thumps()
    mono = near + simmer_and_fire() + stream() + trills()
    return np.array([mono, mono])


def band_limit(x):
    return signal.sosfilt(signal.butter(12, 15520, fs=SR, output="sos"), x)


def record(dry):
    edge = signal.firwin(801, 15560, window=("kaiser", 9), fs=SR)
    thin = highpass(dry, 2, 48)
    return band_limit(signal.oaconvolve(thin, edge[None], "same", axes=1))


dry = scene()
out = record(dry)
wav_record(out)
```